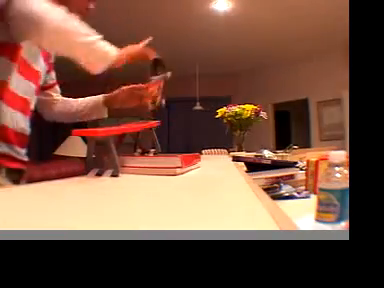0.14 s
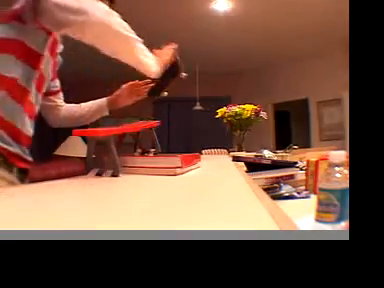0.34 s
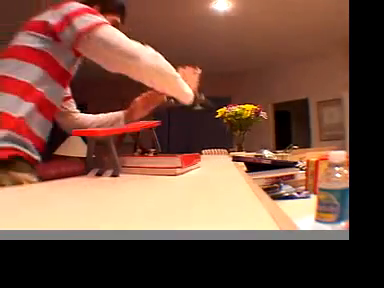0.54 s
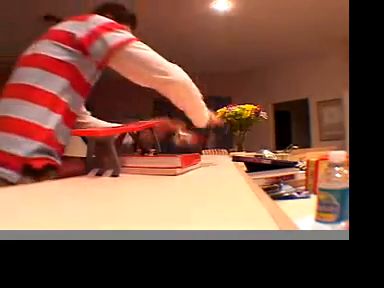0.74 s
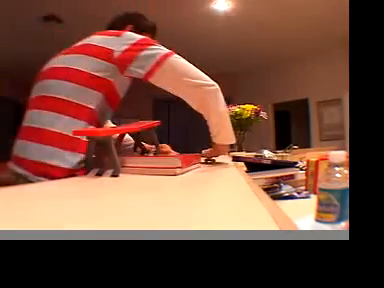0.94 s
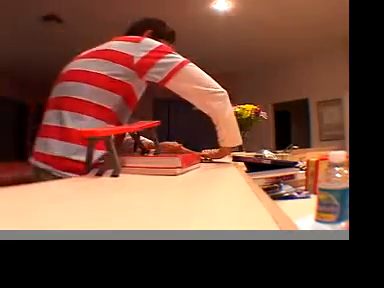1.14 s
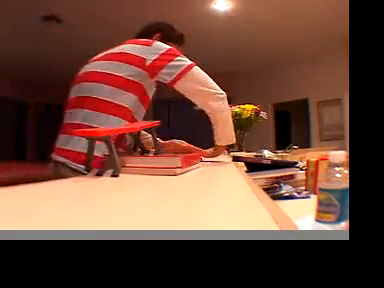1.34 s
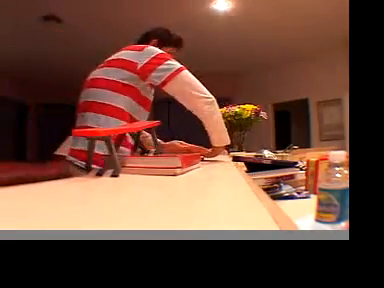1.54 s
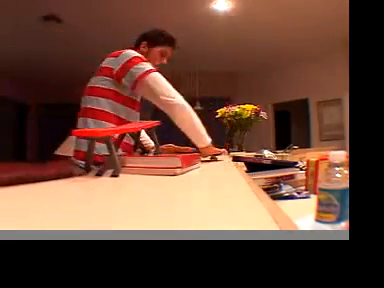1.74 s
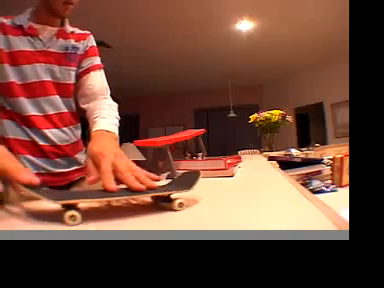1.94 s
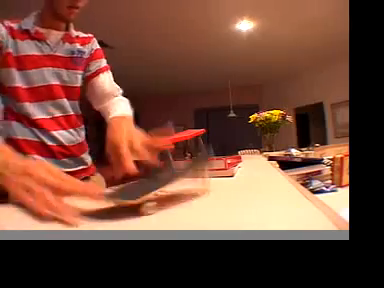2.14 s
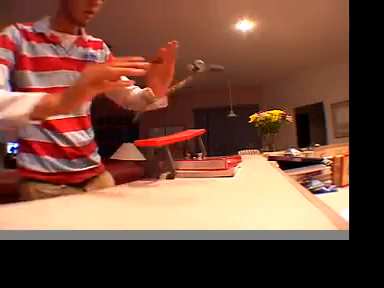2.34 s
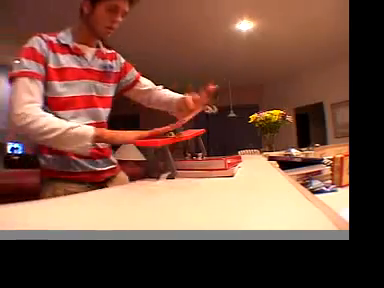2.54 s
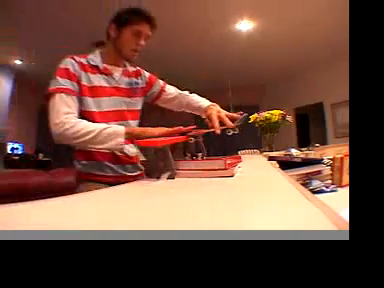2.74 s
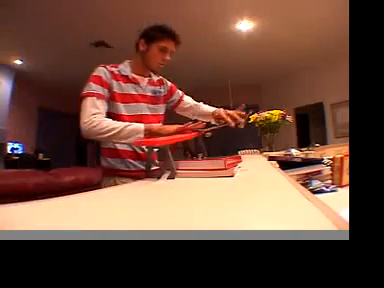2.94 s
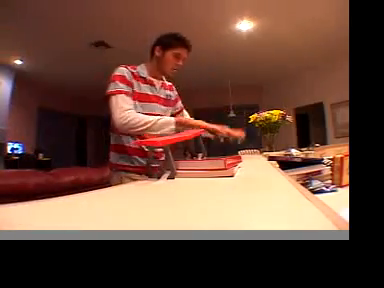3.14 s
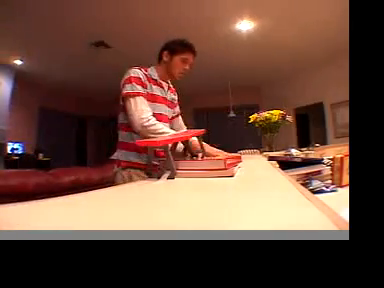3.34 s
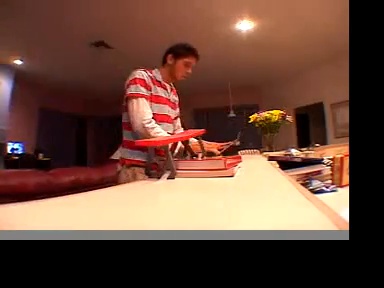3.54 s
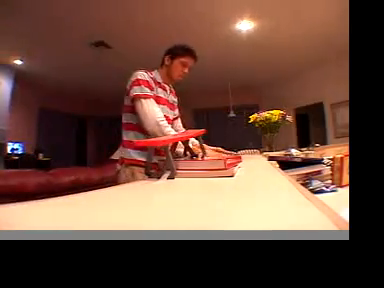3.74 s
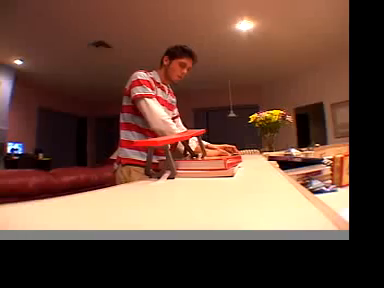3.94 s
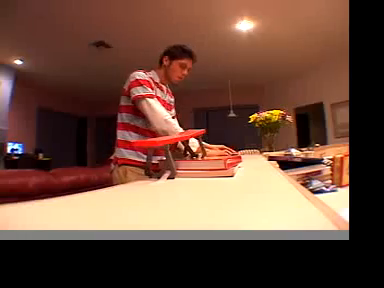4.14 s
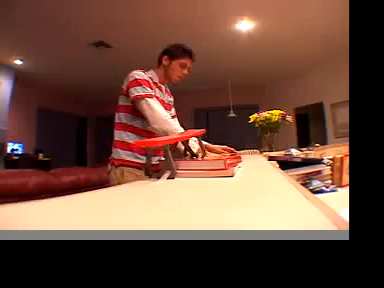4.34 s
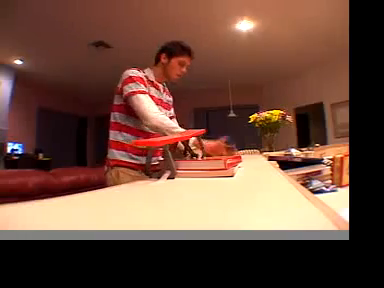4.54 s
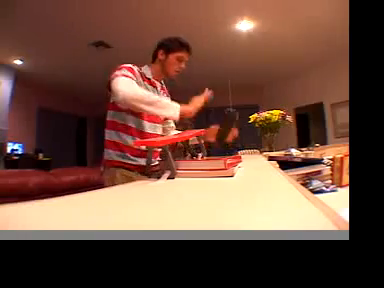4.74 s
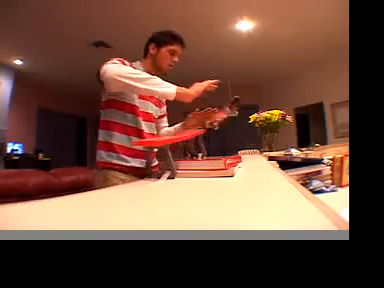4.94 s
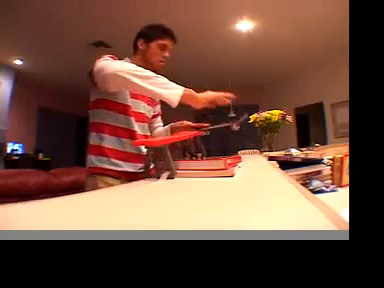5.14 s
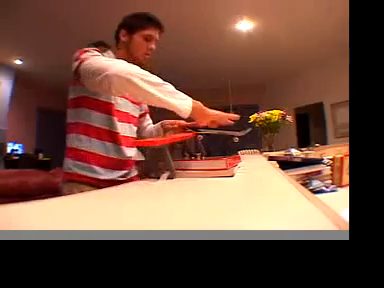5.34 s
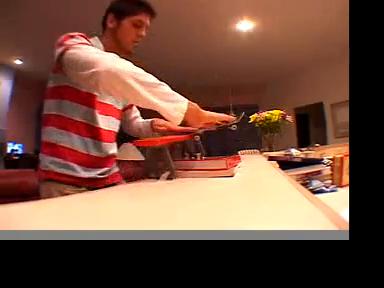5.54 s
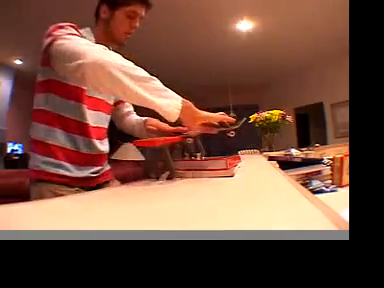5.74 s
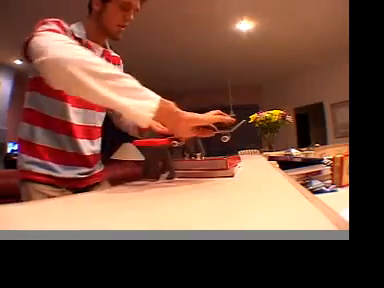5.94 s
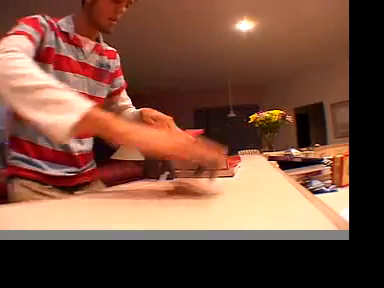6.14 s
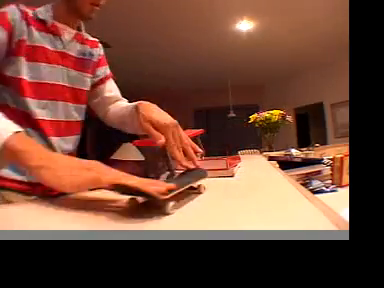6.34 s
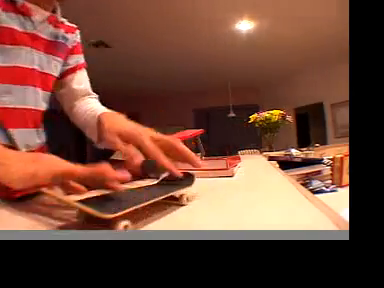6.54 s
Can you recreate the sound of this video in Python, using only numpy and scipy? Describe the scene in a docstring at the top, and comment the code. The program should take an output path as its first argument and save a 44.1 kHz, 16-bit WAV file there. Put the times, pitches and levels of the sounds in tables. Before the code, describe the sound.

A miniature skateboard does tricks on a countertop, heard in stereo with a short room echo over soft hiss and low hum. A deeper, slow-motion pop and clattering landing come first. Then, at full speed, gritty rolling and light ticks lead to a sharp snap, knocks on a plastic rail and bouncing wheels. Small axle squeaks precede another slowed pop, rail clatter and faint scrape. After a momentary cut, the board lands and rolls.

```python
"""A hand-sized skateboard on a countertop in a live room, heard on a pair of microphones over a low drone.
First, in slow motion, lower and longer, its tail is popped, it lands and rolls; a short silence follows.
At full speed it rolls, pops, hits a plastic rail, bounces on the counter, and an axle squeaks.
Slowed again, it pops and hits the rail; after a second silence it lands at full speed and rolls out.
Each blow rings the thing struck, and the room answers until its tail dies or is cut."""
import sys
import numpy as np
from scipy import signal
from scipy.fft import rfft, irfft, next_fast_len
from scipy.io import wavfile
from scipy.ndimage import uniform_filter1d

SR = 44100
rng = np.random.default_rng(int(sys.argv[2]) if len(sys.argv) > 2 else 0)


def wrap_up_sound(samples):
    """Save the sound to the file named by the first command line argument, as 16-bit audio."""
    columns = np.atleast_2d(samples).T
    # keep every value between -1 and 1, then stretch to whole-number steps
    tamed = np.clip(columns, -1, 1)
    steps = np.round(tamed * 32767).astype(np.int16)
    wavfile.write(sys.argv[1], SR, steps)


N = 290619
BURST_SAMPLES = 4096
BURST_HZ = np.fft.rfftfreq(BURST_SAMPLES, 1 / SR)

# passages at slow or full speed, silent in the gaps: (start/s, end/s, speed/ratio)
PASSAGES = [(0, 1.076, .6), (1.109, 1.91, 1), (1.91, 4.55, 1), (4.55, 6.248, .6), (6.279, 7, 1)]
# blows: (t/s, level/dB, tilt/dB per octave, knock f/Hz, knock level/dB, room send/dB)
TAIL_POPS = [(0.081, -0.5, 2, 1830, 7.5, -8), (0.101, -8.5, -2, 1890, -7, -6),
             (2.221, -9.5, -3.5, 4370, -6, -0.5), (2.231, 1, 4, 2915, 17.5, -5),
             (2.244, -10.5, 6, 2920, 1, -6), (2.257, -5, 1, 2120, -13, -16),
             (4.625, 2.5, 2.5, 1750, 14.5, -6), (4.64, -9, -1, 1800, 3, -9)]  # tail snapped on the counter
RAIL_LANDINGS = [(2.549, 2, 3, 2010, 13, -0.5), (2.555, -4.5, 1.5, 2000, 14, -8),
                 (2.567, -4, -4, 1140, 1, 1), (2.676, 0, 2.5, 2020, 10.5, -4.5),
                 (2.749, 1.5, 1.5, 2090, 12, -6.5), (5.076, 5.5, -0.5, 1600, 12, -4),
                 (5.092, 2, -2.5, 616, 15, -24), (5.11, 2, -1.5, 598, -6, -2),
                 (5.126, -14, -5, 611, 7, 5.5), (5.169, 1, 1.5, 1250, 0, -3), (5.184, -5, 1, 713, -1, -9),
                 (5.755, -18.5, 2, 1900, 15, 0.5), (5.785, -13.5, -0.5, 1310, 14, -1.5),
                 (5.804, -22.5, 4.5, 1500, 4, 2)]  # board on the rail
WHEEL_LANDINGS = [(0.831, -19.5, -1.5, 1010, 15, -4), (0.842, 6, -4.5, 700, 12.5, -3),
                  (0.866, 1.5, 2.5, 403, 12.5, -7), (0.884, -7, 3, 3500, 7, -7),
                  (0.891, -5.5, 2.5, 484, -2, 0.5), (0.906, -3, 1.5, 523, 11, -0.5),
                  (0.911, -8, 1, 800, -9, -4), (0.922, -2.5, 1, 345, 11, -1), (0.941, -9, 4, 514, 2, -3),
                  (0.957, 2.5, -1.5, 1370, -8, 0), (1.096, -3, -2, 970, 5, 3.5),
                  (1.644, -24.5, -3, 650, 18, -4), (1.675, -23, -3, 785, 20, -11),
                  (3.27, 3, -1, 1550, 16, -16), (3.276, -2, 0, 1360, 3, 2.5),
                  (3.312, 1.5, -2.5, 1050, 11.5, -1), (3.361, -6.5, -1, 1060, -7, 3),
                  (3.519, -10, 0.5, 935, 13, -13), (3.523, -11, 3.5, 3000, 17, -1.5),
                  (3.534, -17.5, 5, 4500, 0, 1.5), (3.675, -5, -6.5, 1000, 13, -14),
                  (3.679, 1, -4.5, 1945, 19.5, -3), (3.692, -13, 0.5, 4000, 14, -11),
                  (3.702, 2.5, -0.5, 640, 8, -1), (3.716, -3, -3, 403, 20, -10.5),
                  (6.282, 0.5, 0, 3370, 8, -0.5), (6.306, -6, -4, 1970, 15.5, 0.5),
                  (6.329, -11, -2, 1920, -6, 6.5)]  # wheels bouncing on the counter
# the room at the two microphones: (f/Hz, left-right likeness/ratio)
ROOM_LIKENESS = [(100, 0.57), (500, 0.94), (1500, 0.53), (4000, 0.058), (14000, 0.05)]


def amp(db):
    """Decibels to gain."""
    return 10 ** (np.asarray(db) / 20)


def unit_rms(x):
    """Scales to rms 1."""
    return x / np.sqrt(np.mean(x ** 2) + 1e-20)


def curve(points, hz):
    """Reads a spectrum table on a log-frequency axis."""
    f, value = np.transpose(points)
    return np.interp(np.log(hz + 1), np.log(f + 1), value)


def resonance(hz, f, width, db):
    """Power of one resonance with steep sides."""
    return amp(db) ** 2 / (1 + ((hz - f) / width) ** 2 * 1.6) ** 2


def causal(db):
    """Gives a gain curve the phase of a response that starts at once."""
    cepstrum = irfft(np.maximum(db, -100) * np.log(10) / 20)
    cepstrum[1:len(db) - 1] *= 2
    cepstrum[len(db):] = 0
    return np.exp(rfft(cepstrum))


def add(mix, s, sound):
    """Mixes a sound in at s seconds."""
    part = mix[..., round(s * SR):][..., :sound.shape[-1]]
    part += sound[..., :part.shape[-1]]


def stereo_noise(gain, likeness):
    """Noise shaped by gain[band, frame], partly alike at the two microphones."""
    a, b, c, d = rng.standard_normal((*gain.T.shape, 4)).T
    likeness = likeness.reshape(-1, 1)
    left = a + 1j * b
    right = likeness * left + np.sqrt(1 - likeness ** 2) * (c + 1j * d)
    size = 2 * (len(gain) - 1)
    return signal.istft(np.array([left, right]) * gain, nperseg=size, noverlap=size * 3 // 4)[1][:, :N]


def drone_gain(t):
    """The drone drifts slowly in each passage; each blow swells it, and the swell dies away or is cut."""
    # drone, a row a passage: (start level/dB, end level/dB, swell under a blow/dB)
    levels = [(-53, -57, -41.5), (-55.5, -53, -43), (-50.5, -50.5, -33.5), (-58, -45, -40.5),
              (-48, -49, -41)]
    rise_s, t60_s = 0.014, 0.52
    power = np.zeros(len(t))
    for (start, end, speed), (start_db, end_db, swell_db) in zip(PASSAGES, levels):
        passage = amp(np.interp(t, [start, end], [start_db, end_db])) ** 2
        for s, db, *_, room_db in TAIL_POPS + RAIL_LANDINGS + WHEEL_LANDINGS:
            age = np.maximum(t - s, 0) * speed
            swell = amp(db + room_db + swell_db - 60 * age / t60_s) * np.minimum(age / rise_s, 1)
            passage += (start - .03 <= s < end) * swell ** 2
        power += passage * (t >= start - .03) * (t < end)
    return np.sqrt(power)


def room_tone():
    """A steady hush, and a low drone that swells with the blows."""
    # spectrum of the hush: (f/Hz, level/dB)
    air = [(88, -29.5), (150, -12.5), (291, -18.5), (334, -17), (422, -19.5), (601, -23.5), (1560, -29.5),
           (1900, -30), (3290, -38), (16000, -48.5)]
    # room tone at the two microphones: (f/Hz, left-right likeness/ratio)
    likeness = [(60, 0.66), (240, 0.91), (950, 0.82), (3770, 0.07), (15000, 0.05)]
    t, hz = np.arange(N // 512 + 5) * 512 / SR, np.fft.rfftfreq(2048, 1 / SR)[:, None]
    full_speed_hz = hz / speed_at(t)
    hush = amp(curve(air, full_speed_hz))
    hush *= amp(-52.5) / np.linalg.norm(hush, axis=0)
    drone = np.sqrt(resonance(full_speed_hz, 121.7, 19, 0) + resonance(full_speed_hz, 53, 27, -7.5))
    drone *= drone_gain(t) / np.linalg.norm(drone, axis=0)
    return amp(5) * stereo_noise(np.hypot(hush, drone), curve(likeness, hz))


def room_reverb(send, speed):
    """A dense tail that builds in a few milliseconds, each band dying at its own pace."""
    # decay of the room at full speed: (f/Hz, t60/s)
    decay = [(100, 0.7), (300, 0.85), (800, 0.7), (2000, 0.67), (5000, 0.61), (13000, 0.4)]
    t, hz = np.arange(1200) * 64 / SR * speed, np.fft.rfftfreq(256, 1 / SR) / speed
    fade = amp(-60 * t / curve(decay, hz)[:, None])
    early_lift = 1 + .5 * np.exp(-t / 0.071)
    build = np.clip(t / 0.0058 - .1, 0, 1)
    tail = stereo_noise(fade * early_lift * build, curve(ROOM_LIKENESS, hz))
    return signal.fftconvolve(send[None], tail / np.linalg.norm(tail[0]), axes=1)[:, :N]


def speed_at(s):
    """The playing speed at s seconds."""
    return np.array([v for *_, v in PASSAGES])[np.searchsorted([end for _, end, _ in PASSAGES], s)]


def rolling():
    """Grit under the wheels: a flickering rush whose colour follows the push, and the deck humming along."""
    # rolls and slides: (start, turn, end t/s; start, turn, end level/dB; start, end tilt/dB per octave;
    # start, end hum f/Hz; hum width/Hz; hum level/dB)
    strokes = [(0.0, 0.042, 0.086, -26, -24, -24, 1, 2, 1190, 1170, 254, 14.5),
               (0.879, 0.95, 1.09, -14.5, -19, -18, 0.5, 0, 300, 500, 350, 7.5),
               (1.501, 1.66, 1.905, -46, -35.5, -40.5, -4.5, 1, 650, 1252, 450, 9),
               (1.919, 2.054, 2.223, -44, -39.5, -30, -3, -2, 520, 540, 300, 5.5),
               (2.897, 3.152, 3.36, -39, -34.5, -51.5, 5, 3.5, 2880, 3150, 150, 6),
               (4.361, 4.47, 4.57, -52, -40.5, -32.5, -9, -1.5, 300, 500, 300, 3.5),
               (4.558, 4.6, 4.62, -35, -34, -25.5, -1.5, -1.5, 320, 330, 120, 13.5),
               (5.493, 5.803, 6.16, -45.5, -35.5, -42.5, 5.5, 2.5, 1250, 1244, 200, 3),
               (6.182, 6.198, 6.245, -51, -43, -45, 6, 3.5, 1900, 1900, 299.9, 2),
               (6.408, 6.52, 6.64, -28.5, -34.5, -34.5, -3.5, 0, 680, 620, 300, 5)]
    # spectrum of the wheels: (f/Hz, level/dB)
    grit = [(59, -31), (100, -6), (181, -11.5), (210, -5.5), (648, -4), (891, -4.5), (4670, -12),
            (10000, -27.5), (16000, -43)]
    t, hz = np.arange(N // 128 + 5) * 128 / SR, np.fft.rfftfreq(512, 1 / SR)[:, None]
    rows = np.array(strokes)
    current = rows[np.maximum(np.searchsorted(rows[:, 0], t, "right") - 1, 0)].T
    start, _, end, *_, tilt0_db, tilt1_db, hum0_hz, hum1_hz, width_hz, hum_db = current
    progress = np.clip((t - start) / (end - start), 0, 1)
    tilt_db = tilt0_db + (tilt1_db - tilt0_db) * progress
    hum_hz = hum0_hz + (hum1_hz - hum0_hz) * progress
    level = amp(np.interp(t, rows[:, :3].ravel(), rows[:, 3:6].ravel())) * (t <= end + .015)
    full_speed_hz = hz / speed_at(t)
    rush = amp(curve(grit, full_speed_hz) + tilt_db * np.log2(full_speed_hz / 1500 + 0.061))
    colour = rush * np.sqrt(2 + resonance(hz, hum_hz, width_hz, hum_db))
    colour /= np.linalg.norm(colour[4:70], axis=0)  # unit power from about 350 Hz to 6 kHz
    bumps = amp(0.87 * unit_rms(uniform_filter1d(rng.standard_normal(len(t)), size=2)))
    return amp(0.5) * stereo_noise(colour * level * bumps, curve(ROOM_LIKENESS, hz))


def chatter(speed, decay_s, colour_db):
    """One contact: a few milliseconds of coloured noise, partly different at the two microphones."""
    t = np.maximum(np.arange(BURST_SAMPLES) / SR - .0015, 0) * speed
    shared, own = rng.standard_normal(len(t)), rng.standard_normal((2, len(t)))
    envelope = np.exp(-t / decay_s) * np.minimum(t / 0.00097, 1)
    spectrum = rfft((shared + 0.46 * own) * envelope)
    flattened = spectrum / abs(spectrum) ** 0.82
    sound = irfft(flattened * causal(colour_db)) * (t > 0)
    return sound / np.linalg.norm(sound[0])


def ticks_and_squeaks():
    """Wheels and axles under the fingers: one resonance and a faint snap, broad ticks, narrow squeaks."""
    # wheel and axle ticks, then axle squeaks: (t/s, level/dB, f/Hz)
    ticks = [(1.602, -35.5, 3110), (1.99, -34, 4020), (2.028, -34, 3540), (2.04, -30, 4350),
             (2.047, -29, 4120), (2.134, -26, 2220), (2.1465, -22.5, 4560), (2.17, -22.5, 2430),
             (2.212, -22, 4500), (2.512, -24, 3220), (2.529, -19.5, 1990), (4.539, -32.5, 4080),
             (5.37, -23.5, 2870), (5.52, -28.5, 3250), (5.669, -30, 2170), (6.143, -37, 2584)]
    squeaks = [(4.481, -25, 1330), (4.512, -22, 2320), (4.521, -23, 2280), (4.549, -28, 1490),
               (6.193, -31, 1940)]
    room_db, decay_s = -10, .002
    for events, width_hz, snap_db in (ticks, 840, -20), (squeaks, 150, -42):
        for s, db, f in events:
            power = resonance(BURST_HZ, f, width_hz, 0) + resonance(BURST_HZ, 6300, 6000, snap_db)
            yield s, db, room_db, decay_s, 10 * np.log10(power)


def blows(events, modes, thump_db, thud_db, ring_db, dull_ring, low_cut_hz):
    """A broad crack, the modes of the thing struck, the knock of that spot and the counter's low thud."""
    # spectrum of the crack: (f/Hz, level/dB)
    crack_spectrum = [(60, -19.5), (130, -7.5), (330, -2), (700, -0.5), (1100, 4.5), (2140, 2.5),
                      (3600, -0.5), (5400, -1), (6800, -7.5), (9000, -11.5), (11500, -24), (16000, -29)]
    decay_s = .0025
    for s, db, tilt_db, knock_hz, knock_db, room_db in events:
        speed = speed_at(s)
        hz = BURST_HZ / speed
        crack = amp(curve(crack_spectrum, hz) + tilt_db * np.log2(hz / 2000 + 0.17)) ** 2
        lift_db = ring_db - dull_ring * tilt_db  # a duller blow can ring more
        rings = sum(resonance(hz, f, width, mode_db + lift_db) for f, width, mode_db in modes)
        knock = resonance(hz, knock_hz / speed, 240, knock_db)
        radiated = 1 / (1 + (low_cut_hz / (hz + 1)) ** 4)  # small things radiate no deep bass
        counter = resonance(hz, 363, 200, thud_db) + resonance(hz, 45, 45, thump_db)
        power = (crack + rings + knock) * radiated + counter
        yield s, db, room_db, decay_s, 10 * np.log10(power + 1e-12)


def pops_and_landings():
    """The board strikes with its tail, on the rail and with its wheels; the deck rings along each time."""
    # modes at full speed: (f/Hz, width/Hz, level/dB)
    deck = [(790, 130, -1.5), (1374, 150, -8), (2163, 150, -9), (2840, 450, 7.5), (5130, 300, -5),
            (5090, 180, -6)]
    rail = [(1050, 320, 7), (2160, 140, 6.5), (3600, 140, -1), (4060, 120, -11), (5500, 260, -11)]
    counter = [(430, 74, 8), (623, 48, 9), (890, 460, -4), (1520, 980, 5), (3100, 700, 1.5),
               (5540, 400, -40.5)]

    def deck_at(gain_db):
        return [(f, width, db + gain_db) for f, width, db in deck]

    yield from blows(TAIL_POPS, deck + deck_at(-40),
                     thump_db=5, thud_db=-5, ring_db=-1, dull_ring=0, low_cut_hz=297)
    yield from blows(RAIL_LANDINGS, rail + deck_at(-11.5),
                     thump_db=-10, thud_db=-5, ring_db=1.5, dull_ring=2.5, low_cut_hz=700)
    yield from blows(WHEEL_LANDINGS, counter + deck_at(-6),
                     thump_db=-5.5, thud_db=-6.5, ring_db=-6.5, dull_ring=0.7, low_cut_hz=170)


def contacts():
    """Every blow, tick and squeak: what reaches the microphones directly and what goes into the room."""
    direct, send = np.zeros((2, N)), np.zeros(N)
    for s, db, room_db, decay_s, colour_db in [*pops_and_landings(), *ticks_and_squeaks()]:
        pan_db = np.array([[.7], [-.7]]) * rng.standard_normal()
        add(direct, s, amp(db + 13.5 + pan_db) * chatter(speed_at(s), decay_s, colour_db))
        all_round = causal(0.86 * colour_db)  # summed over all directions the colour is flatter
        add(send, s, amp(db + 14 + room_db) * unit_rms(irfft(all_round)) / 64)
    return direct, send


def scene():
    """Board and room, passage by passage, so that each cut also cuts the tail of the room."""
    direct, send = contacts()
    sources = direct + rolling() + room_tone()
    size = next_fast_len(N)
    t, hz = np.arange(N) / SR, np.fft.rfftfreq(size, 1 / SR)
    mix = np.zeros((2, N))
    for start, end, speed in PASSAGES:
        reverb = amp(2) * room_reverb(send * (t >= start - .03) * (t < end), speed)
        spectrum = rfft(sources + reverb, size)
        if speed < 1:  # slowing down lowers the band limit too
            spectrum *= amp(-12 / (1 + (speed * 15500 / (hz + 1)) ** 24))
        gate = uniform_filter1d(1. * ((t >= start) & (t < end)), 40, mode="nearest")
        mix += irfft(spectrum, size)[:, :N] * gate
    return mix


def record(dry):
    """The left microphone hears more bass; the hardest blows overload, then the top treble is cut."""
    # microphone imbalance: (f/Hz, left minus right/dB)
    imbalance = [(60, 5), (240, 5.5), (950, 1.5), (3770, 0.5), (15000, 1.5)]
    size = next_fast_len(N)
    hz = np.fft.rfftfreq(size, 1 / SR)
    response = amp(curve(imbalance, hz) * np.array([[.5], [-.5]]))
    overloaded = np.clip(irfft(rfft(dry, size) * response, size)[:, :N], -1, 1)
    lowpass = signal.firwin(255, cutoff=16100, window=("kaiser", 7), fs=SR)
    return np.clip(signal.oaconvolve(overloaded, lowpass[None], "same"), -1, 1)


dry = scene()
out = record(dry)
wrap_up_sound(out)
```